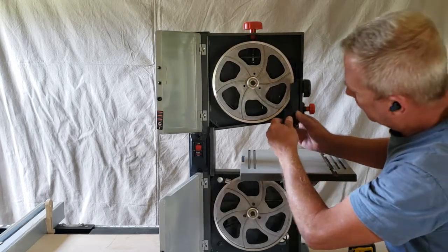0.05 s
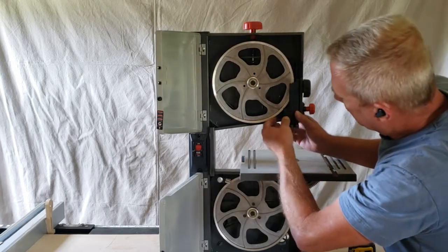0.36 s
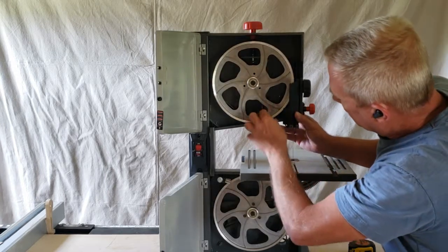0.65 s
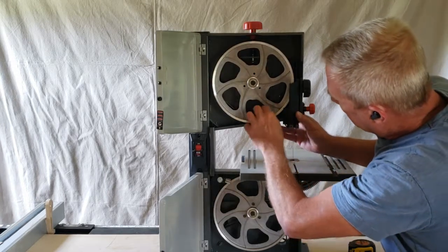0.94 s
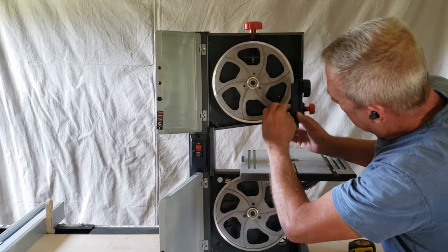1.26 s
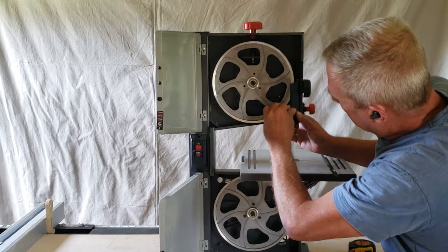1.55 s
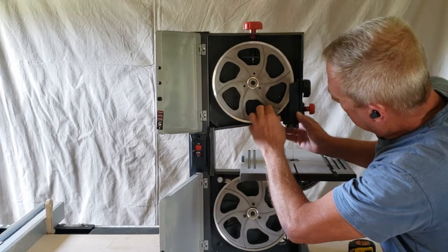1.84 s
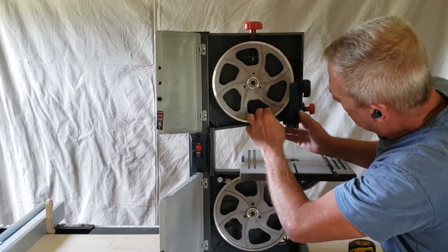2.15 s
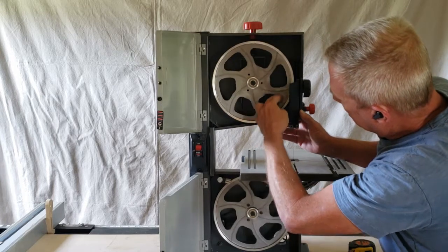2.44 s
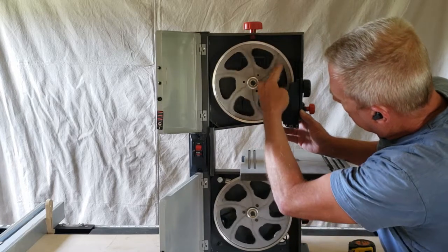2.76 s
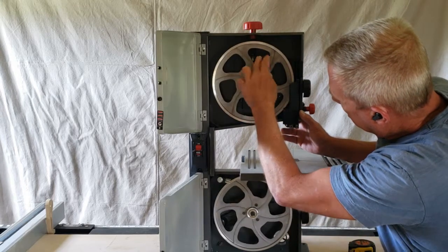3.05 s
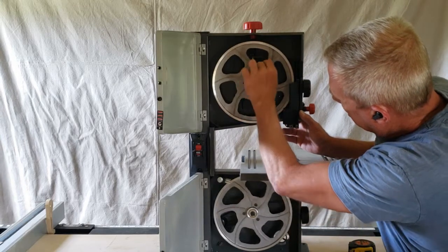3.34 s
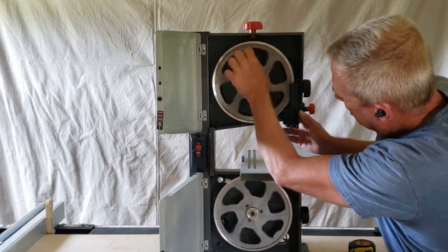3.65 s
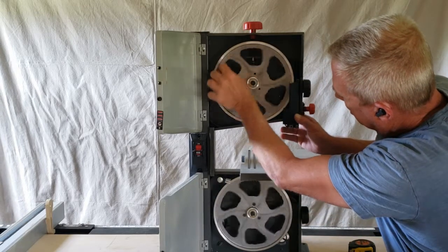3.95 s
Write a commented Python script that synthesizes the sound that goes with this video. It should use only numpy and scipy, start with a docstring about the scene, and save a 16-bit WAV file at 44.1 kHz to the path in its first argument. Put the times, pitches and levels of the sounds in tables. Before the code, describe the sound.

A bandsaw is turned by hand in a quiet workshop. At 0.3 seconds a catch snaps with a brief metallic ring. Short blade chirps and light knocks follow until about 2.1 seconds. From 2.3 to 3 seconds the blade rubs with a gritty hiss, ticks and squeals over faint rumbling and brief groans. A second push runs from 3.3 to 4 seconds, with a few knocks near the end.

```python
"""Over a faint hiss, a catch snaps on a switched-off bandsaw in a quiet workshop.
Knocks make the frame ring, and the blade chirps as the wheel is nudged.
Then a hand turns the wheel in two pushes: the blade rubs with a gritty hiss and squeals
as it sticks and slips, while the frame groans briefly and the wheel rumbles."""
import sys
import numpy as np
from scipy import signal
from scipy.fft import rfft, irfft
from scipy.io import wavfile

SR = 44100
rng = np.random.default_rng(int(sys.argv[2]) if len(sys.argv) > 2 else 0)


def master(y):
    """Save y as 16-bit WAV."""
    cut = np.clip(np.atleast_2d(y).T, -1, 1)
    pcm = np.round(cut * 32767)  # scale
    wavfile.write(sys.argv[1], SR, pcm.astype(np.int16))


N = 176400
T = np.arange(N) / SR


def from_db(db):
    """Turn decibels into a gain to multiply by."""
    return 10 ** (np.asarray(db) / 20)


def rms_one(x):
    """Scale a signal so its average strength (rms) is 1."""
    return x / np.sqrt(np.mean(x ** 2) + 1e-20)


def level(rows):
    """Gain that follows rows of t/s, level/dB; silent before and after them."""
    times, db = np.transpose(rows)
    return from_db(np.interp(T, times, db)) * (T >= times[0]) * (T <= times[-1])


def decay(t, t60):
    """Stay at 1 until t = 0, then fade by 60 dB every t60 seconds."""
    return np.exp(-np.log(1000) * np.maximum(t, 0) / t60)


def drift(rate_hz):
    """A smooth random wobble of typical size 1."""
    pole = np.exp(-2 * np.pi * rate_hz / SR)
    wobble = signal.lfilter([1], [1, -2 * pole, pole * pole], rng.standard_normal(N + SR))
    return rms_one(wobble)[SR:]


def coloured(x, colour, peaks=()):
    """Give a sound a colour (its balance of low and high) and narrow ringing peaks; rms 1."""
    hz = np.maximum(np.arange(N // 2 + 1) * SR / N, 1)
    points, db = np.transpose(colour)
    gain = from_db(np.interp(np.log(hz), np.log(points), db)) * np.minimum(hz / points[0], 1)
    for centre, width, boost_db in peaks:
        gain *= np.sqrt(1 + (from_db(boost_db) ** 2 - 1) / (1 + (2 * (hz - centre) / width) ** 2))
    return rms_one(irfft(rfft(x) * gain, N))


def noise(colour, peaks=()):
    """Coloured noise of rms 1."""
    return coloured(rng.standard_normal(N), colour, peaks)


def workshop_hiss():
    """A faint background hiss that slowly swells and falls back."""
    loudness = [(0, -72.5), (.9, -70.5), (1.1, -64), (1.6, -60), (2.25, -55), (3.2, -56), (4, -66.5)]  # hiss over time: t/s, level/dB
    colour = [(40, -19.5), (120, 3.5), (210, 7), (400, 0), (900, -2), (1700, -0.5), (3200, 1), (4800, -4),
              (5800, -3), (6500, -15), (8000, -37.5)]  # tone of the hiss: f/Hz, level/dB
    peaks = [(1594, 25, 12), (2400, 31, 9), (3080, 27, 9.5), (3230, 18, 12.5), (3863, 22, 6.5),
             (4160, 30, 8.5), (4795, 25, 4)]  # faint pitches in it: f/Hz, width/Hz, boost/dB
    return level(loudness) * noise(colour, peaks)


def wheel_rumble():
    """The wheel makes a low noise as it turns."""
    loudness = [(0, -92.5), (.55, -86), (.66, -64), (.85, -91), (1.08, -76.5), (1.17, -62), (1.38, -65.5),
                (1.7, -78), (1.92, -51), (2.05, -70), (2.25, -64.5), (2.4, -55.5), (2.82, -49.5),
                (3.0, -43), (3.17, -73), (3.27, -69.5), (3.38, -53), (4, -57)]  # rumble over time: t/s, level/dB
    colour = [(25, -40), (55, -27.5), (78, -29.5), (101, 2), (120, -6.5), (145, -1), (170, -19), (205, -9),
              (300, -29), (600, -56)]  # tone of the rumble: f/Hz, level/dB
    return level(loudness) * noise(colour)


def metal_ticks():
    """Metal meets metal in short, bright ticks, as when the catch snaps."""
    ticks = [(0.2, -56.5), (0.3073, -18.5), (1.271, -45), (2.337, -40), (2.405, -39), (2.460, -31.5),
             (2.573, -18.5), (2.587, -29), (2.796, -23), (3.402, -21), (3.761, -41)]  # sharp contacts: t/s, level/dB
    colour = [(1000, -27.5), (3500, -9.5), (4500, 6.5), (5500, -0.5), (6500, -31.5), (8000, -43)]  # tone of a tick: f/Hz, level/dB
    bursts = sum(from_db(db) * (T >= start) * decay(T - start, t60=0.025) for start, db in ticks)
    return noise(colour) * bursts


def frame_knocks():
    """Each knock rings the frame's own notes and a dense clatter; softer contacts sound duller."""
    # hits on the frame: t/s, level/dB, treble cut-off/Hz, boost of the low notes/dB, rise/s
    knocks = [(0.3108, -18.5, 3440, 2.5, 0.0022), (1.275, -54, 3000, 19, 0.0068),
              (1.303, -31, 1080, -2, 0.0068), (1.335, -38, 1100, -3, 0.0074), (1.488, -44.5, 2480, 3, .01),
              (1.836, -26.5, 2090, 3, 0.0028), (3.800, -24, 2270, -27, 0.0022),
              (3.829, -27, 2500, -21, .002), (3.912, -26, 1400, 2, 0.0045)]
    frame_notes = [(205.2, -22, 0.39), (280.8, -18.5, 0.32), (318.3, -12.5, 0.35), (346.3, -13, 0.26),
                   (554, -20, 0.32), (734.4, -20, 0.31), (995, -11, 0.26), (1093.5, -15.5, 0.35),
                   (1120, -20, 0.15), (1233, -21.5, 0.12), (1730, -9.5, .2), (2133, -9, .24),
                   (2246, -11.5, .24), (3090, -13, .28)]  # pitches the frame rings at: f/Hz, level/dB, fade time/s
    clatter_colour = [(100, -29), (220, -7), (330, -3.5), (480, -9.5), (1100, 0), (1450, -6), (2000, 2),
                      (3100, 4), (3700, -6.5), (5600, -7), (6600, -21.5), (8000, -48.5)]  # tone of its dense, short ring: f/Hz, level/dB
    out, t = np.zeros(N + SR), T[:SR // 2]
    clatter_noise = noise(clatter_colour)
    clatter_fade = from_db(-0.5) * decay(t, t60=0.062) + from_db(-3.5) * decay(t, t60=0.28)
    for start, db, cutoff_hz, low_db, rise in knocks:
        clatter = np.roll(clatter_noise, rng.integers(N))[:len(t)] * clatter_fade
        ring = np.zeros(len(t))
        for hz, note_db, t60 in frame_notes:
            gain = from_db(note_db + low_db * (hz < 400))
            ring += gain * decay(t, t60) * np.sin(2 * np.pi * (hz * t + rng.random()))
        knock = (clatter + ring) * np.minimum(t / rise, 1)
        soften = signal.butter(2, cutoff_hz, fs=SR, output="sos")
        i = int(start * SR)
        out[i:i + len(t)] += from_db(db) * signal.sosfilt(soften, knock)
    return out[:N]


def grit(slips_per_s=4000, spread_db=2):
    """Many tiny slips of uneven size, each ringing briefly in the steel."""
    slips = rng.random(N) < slips_per_s / SR
    sizes = from_db(spread_db * np.minimum(rng.exponential(1, N), 5))
    signs = rng.choice([-1, 1], N)
    t = T[:SR // 10]
    ring = rng.standard_normal(len(t)) * decay(t, t60=0.019)
    return signal.fftconvolve(slips * sizes * signs, ring)[:N]


def friction_tone(hz, wobble_hz, rough_db=3):
    """A note kept ringing by rubbing, unsteady in pitch and strength."""
    phase = 2 * np.pi * np.cumsum(hz + wobble_hz * drift(rate_hz=69)) / SR
    return rms_one(np.sin(phase) * from_db(rough_db * drift(rate_hz=80)))


def swell(start, rise, hold):
    """Friction builds up, holds and lets go: a quick fall, then a faint after-ring."""
    build_up = np.clip((T - start) / rise, 0, 1) ** 1.42
    after = T - start - rise - hold
    ring_share = from_db(-13.5)
    return build_up * ((1 - ring_share) * decay(after, t60=0.094) + ring_share * decay(after, t60=0.24))


def blade_squeals():
    """The blade sticks and slips; each squeal has its own mix of the blade's notes and some scrape."""
    # stick-slip bursts: t/s, rise/s, hold/s, scrape level/dB, then level/dB of each blade note
    squeals = [(.622, .015, 0.013, -41, -57, -46.5, -54, -27, -37.5, -36, -41.5, -71),
               (1.127, 0.012, 0.035, -44.5, -57.5, -71, -73, -44, -75, -53.5, -56, -52.5),
               (1.772, 0.011, .010, -61, -68, -68, -70, -54.5, -61.5, -70, -74, -85),
               (1.850, .025, 0.031, -36.5, -54, -45, -55, -34, -51, -47, -65, -57),
               (1.892, .014, 0.02, -32, -39, -32.5, -39.5, -42, -43.5, -46, -52, -68),
               (2.105, 0.011, 0.0092, -43.5, -69, -62, -48, -49, -36.5, -71, -37, -40.5),
               (2.122, .012, 0.0078, -37.5, -53.5, -36.5, -31.5, -68, -26, -56, -31.5, -42.5),
               (2.809, 0.046, 0.066, -34.5, -35, -31.5, -41.5, -29.5, -30, -46, -36.5, -49.5),
               (2.925, .013, 0.0078, -30.5, -23, -27, -45, -41, -16, -42, -30, -48),
               (2.960, 0.0049, .016, -33, -28, -31.5, -31, -45, -15.5, -47, -27.5, -49),
               (2.979, .008, 0.0082, -30.5, -20.5, -32, -27.5, -37, -31, -45, -40, -60),
               (3.293, .018, 0.0089, -45.5, -53.5, -52, -54.5, -55, -30, -51, -43.5, -47),
               (3.318, 0.013, 0.014, -47, -32, -49, -51.5, -61, -48, -59, -41, -51),
               (3.378, .022, 0.027, -42.5, -50, -44.5, -51, -54, -32.5, -53, -31, -40),
               (3.435, 0.021, 0.034, -49, -38.5, -64, -65, -60, -51, -57, -38.5, -56),
               (3.490, 0.027, 0.057, -46, -41.5, -38.5, -59, -57.5, -34.5, -48, -32.5, -45.5)]
    blade_notes = [(1125, 14), (2235, 24.9), (2400, 14), (3075, 12), (4220, 14), (5000, 35), (5620, 60),
                   (6660, 55)]  # pitches the blade rings at: f/Hz, wobble/Hz
    scrape_colour = [(100, -33.5), (300, -12.5), (700, -9), (1500, -10.5), (2300, -6), (2700, -6.5),
                     (3200, -3), (3600, 0.5), (4300, 0), (5200, -10), (5800, 0.5), (6300, -7.5),
                     (7000, -10), (8000, -46)]  # tone of the scrape: f/Hz, level/dB
    swells = np.array([swell(*row[:3]) for row in squeals])
    gains = from_db(np.array(squeals)[:, 3:]).T
    scrape_gain, *note_gains = np.sqrt(gains ** 2 @ swells ** 2)  # overlapping squeals add in power
    scrape = scrape_gain * coloured(grit(), scrape_colour)
    notes = sum(gain * friction_tone(hz, wobble) for gain, (hz, wobble) in zip(note_gains, blade_notes))
    return scrape + notes


def blade_rub():
    """The moving blade rubs with a gritty, ringing hiss that flickers slightly."""
    # rubbing during the nudges and each push: t/s, level/dB (before boost_db)
    nudges = [(.9, -86), (1.01, -66), (1.1, -82), (1.255, -78), (1.28, -50.5), (1.34, -45.5), (1.41, -69),
              (1.47, -71), (1.51, -51.5), (1.59, -72), (1.97, -76), (2.04, -51.5), (2.1, -74), (2.25, -76)]
    first_push = [(2.26, -66.5), (2.342, -28), (2.36, -30.5), (2.578, -29.5), (2.61, -35.5), (2.686, -31.5),
                  (2.696, -29.5), (2.722, -29), (2.73, -27.5), (2.778, -24), (2.788, -21.5), (2.84, -23),
                  (2.92, -37.5), (2.978, -35.5), (3.038, -48.5), (3.16, -69)]
    second_push = [(3.28, -72), (3.312, -37), (3.362, -38), (3.412, -38), (3.474, -37), (3.508, -32),
                   (3.628, -30), (3.662, -35.5), (3.696, -32.5), (3.712, -37), (3.762, -25.5), (3.976, -38),
                   (4.0, -38.5)]
    # tone of the rub, up to and then during the second push: f/Hz, level/dB
    early_colour = [(120, -29), (300, -24), (450, -17.5), (1000, -15.5), (1800, -17.5), (2700, -14),
                    (3550, -13), (4000, 13.5), (4450, 2), (5000, 2), (5350, 0), (5700, -11.5), (6300, -23),
                    (7000, -15.5), (7800, -60)]
    late_colour = [(120, -27.5), (300, -14.5), (750, -15), (1400, -13.5), (2200, -11), (2700, -20),
                   (3550, -16), (4000, 0.5), (4500, 1), (4950, 6.5), (5350, 0), (5700, -13.5),
                   (6300, -18.5), (7000, -20.5), (7800, -57)]
    peaks = [(2193, 51, 7), (3090, 39, 18), (3927, 39, 3), (4430, 58, 4), (4820, 71, 2.5)]  # pitches that ring in the rub: f/Hz, width/Hz, boost/dB
    moves = [(nudges, 1.5, early_colour), (first_push, 4, early_colour), (second_push, 2, late_colour)]
    flicker = from_db(1.1 * drift(rate_hz=30))
    return flicker * sum(level(curve) * from_db(boost_db) * coloured(grit(), colour, peaks)
                         for curve, boost_db, colour in moves)


def frame_groans():
    """Single notes of the saw swell and die away as the wheel goes round."""
    groans = [(2.333, 0.0073, .022, 770, -35), (2.338, 0.033, .012, 557, -37.5),
              (2.39, 0.017, .02, 421.5, -42), (2.457, 0.024, .02, 412, -39), (2.41, 0.018, .04, 770, -46),
              (2.752, 0.029, .02, 756, -38.5), (2.773, 0.032, .015, 409, -28),
              (2.995, 0.033, .04, 3860, -38.5), (3.485, 0.028, .05, 752, -41),
              (3.586, 0.015, .018, 745, -33.5), (3.589, .014, .012, 412, -41),
              (3.584, 0.026, .04, 547.6, -37), (3.741, 0.013, .025, 780, -43),
              (3.744, 0.031, .195, 552, -40), (3.908, 0.0057, .005, 1295, -26),
              (3.924, .015, .022, 1353, -38.5)]  # notes the wheel sets humming: t/s, rise/s, hold/s, f/Hz, level/dB
    return sum(from_db(db) * swell(start, rise, hold) * friction_tone(hz, wobble_hz=16)
               for start, rise, hold, hz, db in groans)


def scene():
    """All the saw's sounds over the workshop's hiss, in one channel."""
    background = wheel_rumble() + workshop_hiss()
    handling = frame_knocks() + metal_ticks()
    friction = blade_squeals() + blade_rub() + frame_groans()
    return (background + handling + friction)[None]


def record(dry):
    """The microphone cuts off the treble above 7900 Hz."""
    return signal.sosfilt(signal.ellip(10, .2, 80, 7900, fs=SR, output="sos"), dry)


dry = scene()
out = record(dry)
master(out)
```